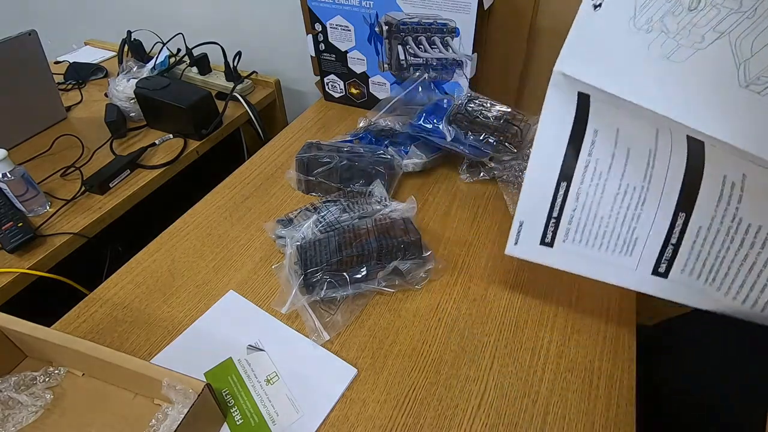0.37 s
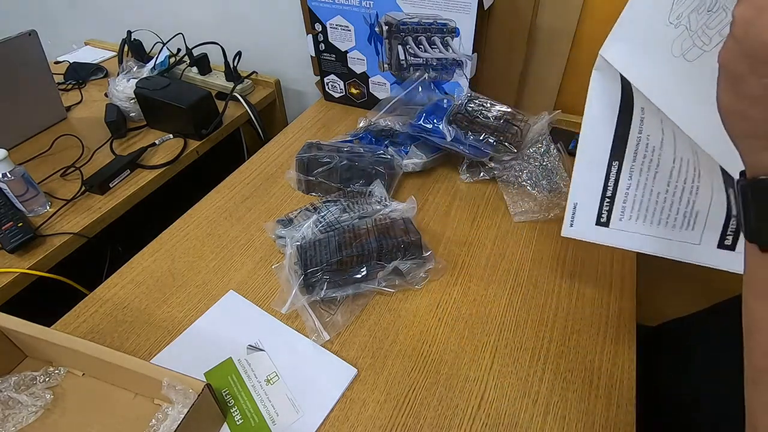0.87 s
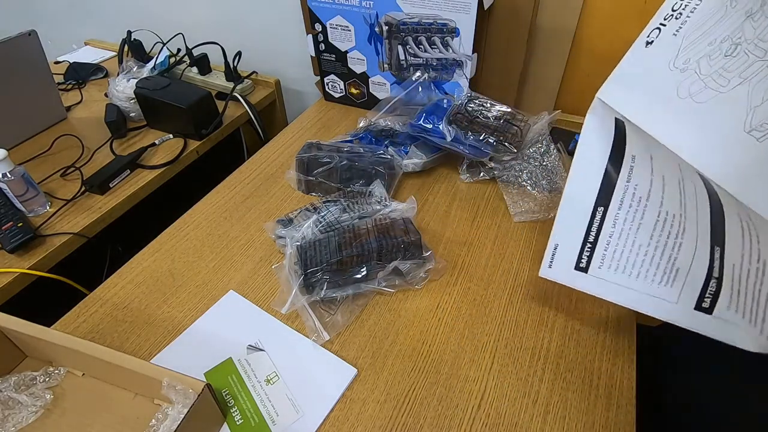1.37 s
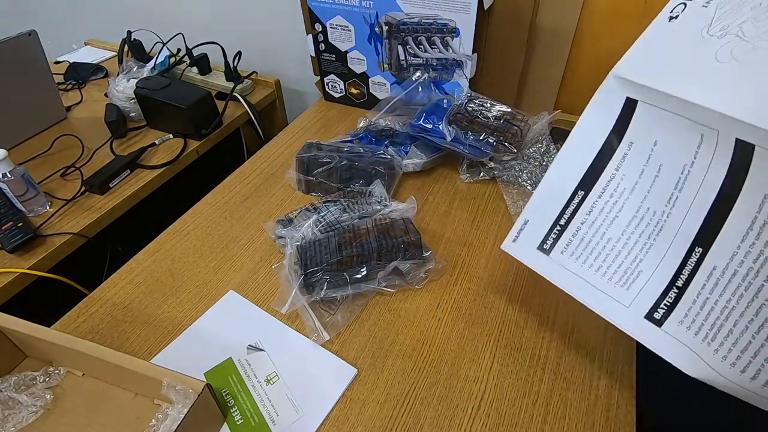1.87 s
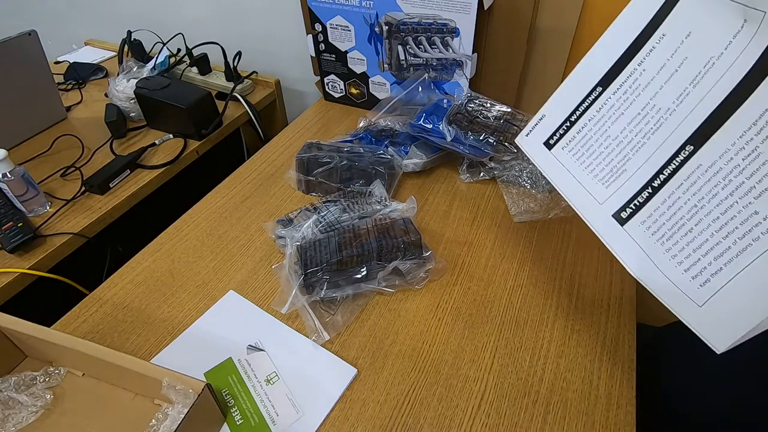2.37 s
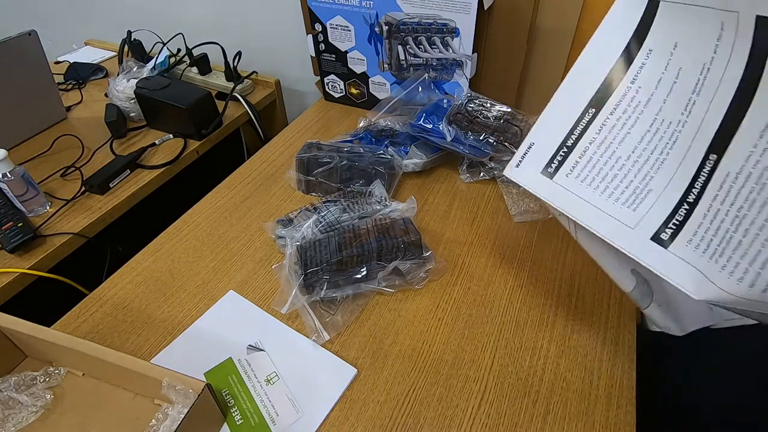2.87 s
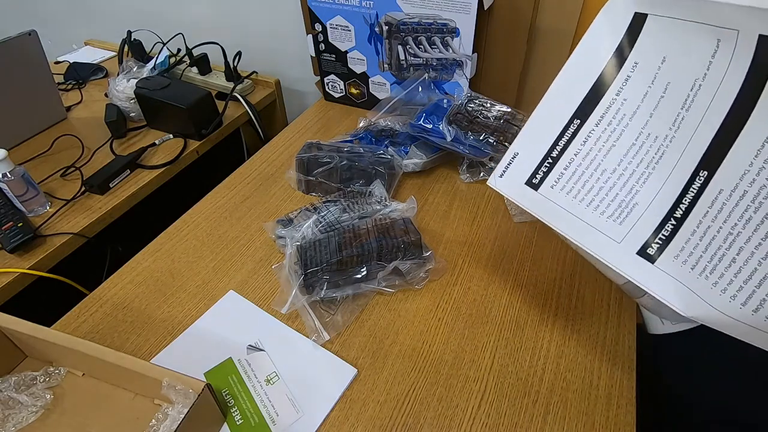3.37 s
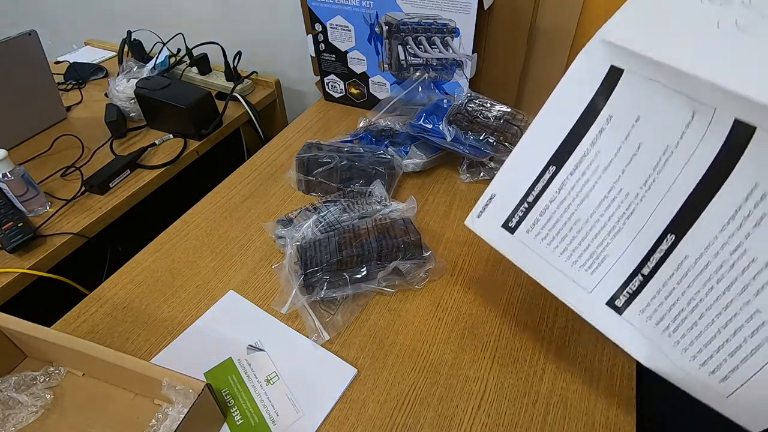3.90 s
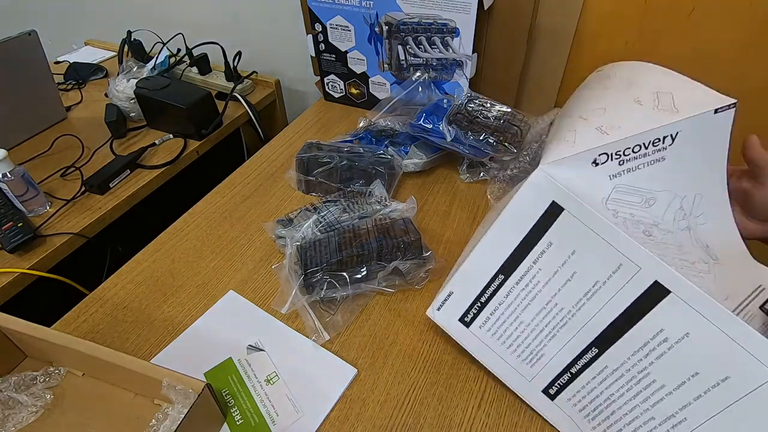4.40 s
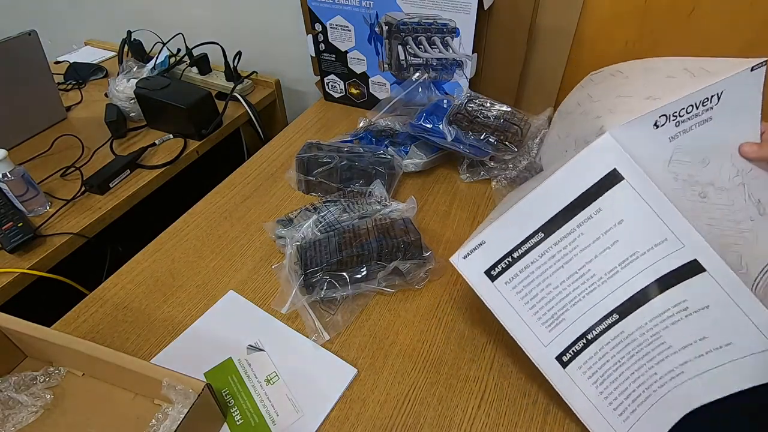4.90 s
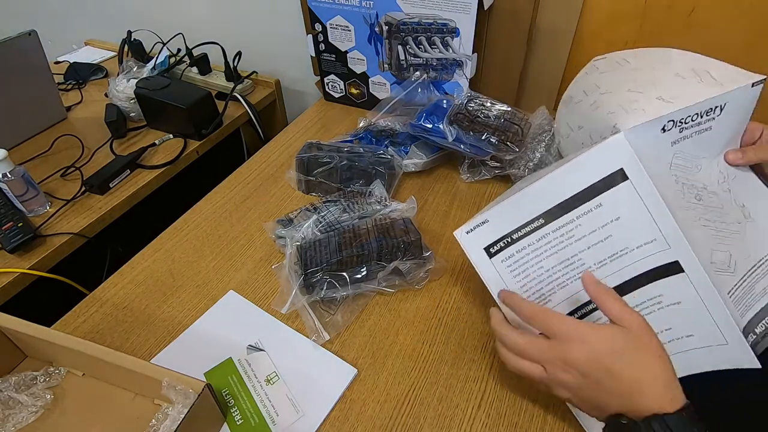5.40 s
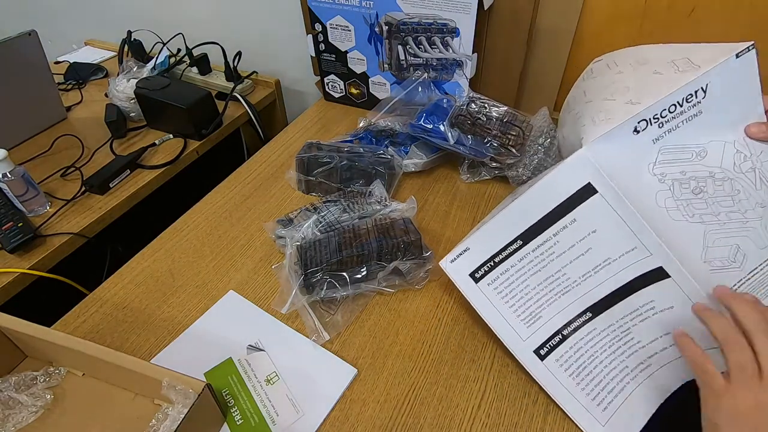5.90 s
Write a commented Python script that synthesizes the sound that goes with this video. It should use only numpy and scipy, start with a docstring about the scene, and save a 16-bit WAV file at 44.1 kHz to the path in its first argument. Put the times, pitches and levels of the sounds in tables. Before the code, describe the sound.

Close indoor sound of a large, stiff folded sheet being opened by hand, over steady soft fan air and a low hum that wavers irregularly in level. At 0 s fingers are already brushing the paper and a crease snaps sharply, followed by small ticks. From 0.5 to 1.2 s only thin, soft sliding is heard. Crisp pops come around 1.3 s, with a dull flop near 1.5 s. From 2 to 3 s the scraping thickens, with a tiny fuzzy falling squeak at 2.3 s and hollow buckles near 2.8 and 3 s. It eases until about 3.9 s, then the loudest burst arrives at 4.0-4.35 s: hard snaps, a low flap and dense rustling. Lighter rubbing and crackles follow; at 5.2-5.5 s come finger brushes, bright sharp snaps and soft pats, then small ticks fade toward 6 s. Faint low air puffs accompany the movements.

```python
"""A crease snaps over fingers already brushing the paper: a large folded sheet is turned and opened by hand.
Creases buckle as short damped rings, with dull pats of noise in a low ring; paper and fingers slide as
grainy noise with small crackles, and a narrow whistle squeaks once. Air puffs, steady fan noise and an
unsteady low hum of random level fill the bass. A small room answers the blows; the microphone has a
peak near 10 kHz."""
import sys
import numpy as np
from scipy import signal
from scipy.io import wavfile
from scipy.ndimage import uniform_filter1d

SR = 44100
rng = np.random.default_rng(int(sys.argv[2]) if len(sys.argv) > 2 else 0)


def to_wav(s):
    """Save 16-bit WAV."""
    ch = np.atleast_2d(s).T  # columns
    pcm = np.round(np.clip(ch, -1, 1) * 32767)  # PCM
    wavfile.write(sys.argv[1], SR, pcm.astype(np.int16))


def amplitude_ratio(level_db):
    """Convert a level in decibels to the matching linear amplitude (field) ratio."""
    exponent = np.asarray(level_db, float) / 20
    return 10 ** exponent


N = 265482

# Levels are those ahead of the microphone; spectra give only the shape of a sound.
# creases buckling: t/s, peak level of the body/dB, ring f/Hz,
# level of the whole sheet's flap re body/dB, level of the crisp edge re body/dB
CREASE_SNAPS = [(0.011, -22, 1190, -7.5, -37), (0.038, -33.5, 1200, -8, 1), (0.061, -41, 2900, -13, 11),
                (0.168, -40, 764, -5, -18), (0.298, -47.5, 1840, 0, 5), (0.426, -32.5, 1120, -43, -27),
                (1.071, -42, 1510, -4, -20), (1.202, -37.5, 1150, 1.5, -22), (1.28, -21.5, 1450, -48, -35),
                (1.363, -25.5, 1370, -45, -31), (1.528, -28.5, 1450, 0, -22), (1.635, -41, 1275, -7, -27),
                (1.642, -45, 1490, -8, -25), (1.922, -39, 1170, -7, -3), (1.979, -40, 1090, -2, -17),
                (2.028, -33, 1140, -7.5, -21), (2.158, -35, 730, 0.5, -18), (2.513, -39, 2580, -11, -12),
                (2.638, -38, 1270, -3, -19), (2.772, -21, 780, -5.5, -20), (2.868, -36.5, 1581, -7, -20),
                (2.991, -26.5, 780, -6, -28), (3.058, -39.5, 1450, -21, -24), (3.099, -37.5, 989, 2.5, -17),
                (3.509, -42, 1250, -15, -25), (3.609, -29, 1570, -16, -7.5), (3.362, -51, 2600, -20, -15),
                (3.665, -38, 1381, -7, -8), (3.903, -37, 2445, -24, -26), (4.005, -15, 1440, -7, -14.5),
                (4.175, -52, 1627, 2, 3.5), (4.213, -11, 720, -9.5, -12.5), (4.218, -18, 2430, -30, -17),
                (4.232, -32, 1500, -8, -20), (4.331, -14.5, 2085, -16.5, -32), (4.537, -40, 700, -16, -26),
                (4.67, -31.5, 1590, -6, -10), (4.717, -31, 4300, -29, -11), (4.796, -44, 2420, -22, 10.5),
                (4.841, -37, 644, -23, -20), (5.025, -36.5, 1224, -5, -20), (5.177, -38.5, 800, -27, -6),
                (5.192, -41, 1560, -5, 13), (5.302, -32, 1100, -13, -28), (5.379, -24.5, 3340, -26, 1),
                (5.385, -17, 3800, -20, -34), (5.594, -37, 4000, -22, -4), (5.605, -41, 3800, -25, -4),
                (5.698, -43, 1770, -25, -15), (5.73, -36.5, 2070, -30, -21), (5.766, -37, 2080, -32, -7),
                (5.891, -43, 2104, -9, -17), (5.913, -39, 1210, -13, -23)]
# what a buckling crease radiates, stretched upward for high rings: f/Hz, level/dB
SHEET_RADIATION = [(150, -50.5), (500, -3.5), (1200, 4.5), (3200, -0.5), (4200, -9), (5200, -22),
                   (7000, -25), (12000, -49)]
# dull blows, the sheet flopping over or a palm patting it flat: t/s, peak level/dB, ring f/Hz, t60 of the blow/s
DULL_PATS = [(1.531, -30.5, 254.5, 0.08), (2.993, -38.5, 170, 0.1), (4.215, -26, 245, 0.054),
             (5.323, -39, 1220, 0.087), (5.417, -37, 686, 0.096), (5.503, -32, 740, 0.066)]
# broad panels scrape past each other: t of the crest/s, rise/s, fall/s, level before clumping/dB, tautness/0-1
PANEL_STROKES = [(0.011, 0.032, 0.017, -43, 0.13), (0.066, 0.069, 0.038, -49, 0.6),
                 (0.12, .15, 0.41, -59, 0.25), (0.172, 0.022, 0.02, -54, .3),
                 (0.304, 0.038, 0.56, -60.5, 0.45), (0.65, 0.27, 0.26, -62, 0.75),
                 (0.98, 0.18, 0.53, -58, 0.66), (1.28, 0.13, 0.11, -60.5, 0.1), (1.4, 0.18, 0.23, -65, 0.9),
                 (1.544, 0.12, 0.29, -53, 0.58), (1.99, 0.11, 0.42, -61, 0.3),
                 (2.116, 0.33, .3, -52.5, 0.62), (2.224, 0.07, 0.27, -58, 0.7),
                 (2.318, 0.15, 0.13, -45.5, 0.33), (2.51, .12, 0.047, -55, 0.2),
                 (2.7, 0.15, 0.15, -47.5, 0.62), (2.872, 0.18, 0.036, -50, 0.22),
                 (2.952, 0.14, 0.21, -52, 0.53), (3.1, 0.12, 0.25, -52, 0.2),
                 (3.2, 0.15, 0.089, -53.5, 0.5), (3.358, 0.064, 0.2, -58.5, 0.43),
                 (3.52, .03, 0.15, -57, 0.36), (3.61, 0.016, 0.025, -49.5, 0.9),
                 (3.686, 0.093, 0.13, -55, 0.36), (3.81, 0.054, 0.5, -57, 0.5),
                 (4.006, .02, 0.1, -41.5, 0.57), (4.12, 0.23, 0.19, -55.5, 0.15),
                 (4.181, 0.0081, 0.2, -45.5, 0.45), (4.235, 0.039, 0.078, -40.5, 0.5),
                 (4.275, 0.13, 0.15, -41, 0.32), (4.42, .2, 0.24, -54.5, 0.27),
                 (4.723, 0.061, 0.25, -49.5, 0.35), (4.83, 0.13, 0.21, -53, 0.8),
                 (4.928, 0.11, 0.1, -50, 0.5), (5.1, 0.81, 0.61, -57, 0.47), (5.3, 0.056, 0.16, -53, 0),
                 (5.374, 0.13, 0.054, -48.5, 0.52), (5.385, 0.016, 0.017, -48, 0.6),
                 (5.43, .1, 0.27, -51, 0.33), (5.596, 0.09, 0.033, -55, 0.8), (5.75, .3, .3, -64, .5),
                 (5.92, 0.12, 0.16, -56.5, 0.34)]
# scrape of slack paper: f/Hz, level per Hz/dB
SLACK_SPECTRUM = [(300, -35.5), (900, -4.5), (1500, 3), (2500, -5.5), (4500, -36.5), (9000, -14.5),
                  (16000, -25)]
# scrape of taut paper: f/Hz, level per Hz/dB
TAUT_SPECTRUM = [(500, -53), (1500, -8.5), (2500, 0.5), (3400, -2), (5500, -11), (8000, -23.5),
                 (16000, -26)]
# fingers brush along the edges: t of the crest/s, rise/s, fall/s, level before clumping/dB
FINGER_BRUSHES = [(0.0, .1, 0.047, -47), (0.066, 0.042, 0.12, -53.5), (0.172, 0.023, 0.082, -59),
                  (0.304, .05, .3, -64.5), (0.65, 0.2, 0.19, -59), (0.98, 0.12, 0.25, -57.5),
                  (1.282, .15, .15, -67), (1.544, 0.26, 0.24, -56.5), (1.88, 0.26, .05, -70),
                  (1.99, 0.1, .3, -57), (2.116, 0.26, .3, -53), (2.25, 0.15, 0.18, -50),
                  (2.51, .15, 0.057, -67), (2.72, 0.21, .25, -59), (2.872, 0.081, 0.035, -56),
                  (2.952, 0.14, 0.14, -55.5), (3.15, .2, .3, -68), (3.52, .05, 0.091, -78),
                  (3.61, 0.027, 0.12, -64.5), (4.02, .1, .15, -61), (4.27, 0.33, 0.19, -55.5),
                  (4.5, .25, 0.28, -63.5), (4.722, 0.077, 0.45, -57), (4.928, .15, 0.15, -53),
                  (5.1, .4, .4, -64), (5.192, 0.011, 0.033, -51), (5.23, .05, .1, -58),
                  (5.374, 0.17, 0.077, -50.5), (5.386, 0.016, 0.019, -39), (5.41, .05, 0.24, -55.5),
                  (5.596, 0.019, 0.038, -55.5), (5.85, 0.65, .6, -68.5)]
# hiss of the brushing fingers: f/Hz, level per Hz/dB
BRUSH_SPECTRUM = [(1500, -43), (3500, 23.5), (5500, 15.5), (7500, 22.5), (12000, 23.5), (16000, -56)]
# the panels flex as the sheet bends over: t of the crest/s, rise and also fall/s, level before clumping/dB
PANEL_BENDS = [(0.037, 0.047, -50), (0.147, 0.06, -52), (0.503, 0.34, -60.5), (1.563, 0.097, -49),
               (1.762, 0.23, -61), (2.02, 0.18, -53), (2.46, 0.35, -56.5), (2.64, 0.099, -56),
               (3.05, 0.37, -52), (3.512, 0.036, -53.5), (3.712, 0.11, -53), (4.059, 0.11, -40.5),
               (4.2, 0.063, -47), (4.352, 0.067, -44), (5.028, 0.27, -53.5), (5.31, 0.069, -46.5),
               (5.45, 0.21, -48.5)]
# low rustle of flexing panels: f/Hz, level per Hz/dB
FLEX_SPECTRUM = [(100, -39.5), (300, -1), (600, -13.5), (1000, -14), (2000, -47.5)]
# a fingertip squeaks along the paper: t/s, f/Hz, level/dB
FINGER_SQUEAK = [(2.272, 1718, -58), (2.299, 1540, -45.5), (2.329, 1465, -42), (2.341, 1460, -77)]
# the moving sheet fans puffs of air at the microphone: t of the crest/s, level/dB
AIR_PUFFS = [(0.0, -52), (0.65, -63), (1.25, -57), (1.611, -58), (2.28, -54.5), (3.0, -57), (3.86, -68),
             (4.04, -63), (4.22, -61), (4.35, -50.5), (5.37, -63), (5.53, -60), (4.58, -61), (5.87, -59)]
# low air pressure of puffs and draught: f/Hz, level per Hz/dB
PUFF_SPECTRUM = [(10, -21), (30, 3.5), (50, -1.5), (100, 3.5), (130, 5), (200, -36)]
# air noise of the fan: f/Hz, level per Hz/dB
FAN_SPECTRUM = [(60, -21.5), (115, -28), (140, -3), (200, 0.5), (250, -3), (330, -4), (430, -11),
                (530, -21), (900, -26.5), (3000, -32), (7000, -35), (10500, -36), (11500, -63),
                (16000, -49)]
# level of the low hum, rising and falling at random: t/s, level before the fine flutter/dB
HUM_RANDOM_LEVEL = [(0.0, -43.5), (0.1, -61), (0.52, -49), (0.64, -60.5), (0.87, -46.5), (0.92, -62),
                    (1.04, -48), (1.32, -52.5), (1.46, -45), (1.54, -62), (2.62, -50.5), (3.1, -65),
                    (3.14, -51.5), (4.11, -52), (4.22, -47), (4.26, -55), (4.44, -52), (4.49, -67),
                    (4.54, -46), (4.59, -47.5), (4.83, -63), (4.9, -47.5), (5.2, -80), (5.31, -50.5),
                    (5.85, -63), (6.02, -49.5)]
# decay of the room: f/Hz, t60/s
ROOM_DECAY = [(200, 0.9), (1000, 0.5), (3000, 0.42), (8000, 0.38)]
# microphone response: f/Hz, level/dB
MICROPHONE_RESPONSE = [(6000, 0.5), (8000, -10), (9900, -5.5), (10600, -10.5), (11400, -26), (12200, -19),
                       (13000, -17), (13900, -11.5), (14800, -20), (15600, -36)]


def evened(x):
    """Scales to rms 1."""
    return x / np.sqrt(np.mean(x ** 2) + 1e-20)


def read(points, hz):
    """Reads a spectrum on a log-frequency axis."""
    f, value = np.transpose(points)
    return np.interp(np.log(hz + 1), np.log(f + 1), value)


def coloured(x, points):
    """Causal minimum-phase filter with the given spectrum, so that clicks keep their sharp start."""
    log_gain = np.log(amplitude_ratio(read(points, abs(np.fft.fftfreq(8192, 1 / SR)))))
    taps = np.fft.ifft(np.exp(np.conj(signal.hilbert(log_gain)))).real[:4096]
    return signal.oaconvolve(x, taps)[:len(x)]


def ring(x, hz, width_hz):
    """One damped resonance."""
    return signal.lfilter(*signal.iirpeak(hz, hz / width_hz, SR), x)


def from_knots(knots):
    """Joins values 64 samples apart by straight lines, one value per sample."""
    return np.interp(np.arange(N) / 64, np.arange(len(knots)), knots)


def wobble(per_s):
    """Slow chance of rms 1: noise low-passed at per_s Hz."""
    knots = rng.standard_normal(N // 64 + 2)
    lowpass = signal.butter(2, per_s * 128 / SR)
    return from_knots(evened(signal.lfilter(*lowpass, knots)))


def swell(s, rise_s, fall_s, db):
    """Summed gain of strokes that sink 20 dB within their rise before and their fall after the crest."""
    fade_db, bend = 20, 1.3  # a bend above 1 rounds the crest
    t = np.arange(0, N + 64, 64)[:, None] / SR - s
    away = np.where(t < 0, -t / rise_s, t / fall_s)
    power = amplitude_ratio(db - fade_db * away ** bend) ** 2
    return from_knots(np.sqrt(power.sum(1) + 1e-12))


def grains(per_s, spread_db):
    """Sparse slips of random sign and size; spread_db makes a few larger still."""
    size = amplitude_ratio(spread_db * np.minimum(rng.exponential(1, N), 2.5))
    happens = rng.random(N) < per_s / SR
    return evened(size * rng.standard_normal(N) * happens)


def snaps():
    """Each crease yields, jumps, and bending waves rattle back from the edges of the sheet."""
    t60_at_1khz_s, shortening = 0.041, 0.46  # higher rings die sooner by this power
    t, out = np.arange(6000) / SR, np.zeros(N + 6000)
    for s, peak_db, hz, flap_db, crisp_db in CREASE_SNAPS:
        t60 = t60_at_1khz_s * (1000 / hz) ** shortening
        signs = rng.choice([-1., 1.], len(t))
        returns = (rng.random(len(t)) < .14) * (t > .0018)
        rattle = .33 * signs * returns * amplitude_ratio(-60 * t / t60)
        rattle[[30, 62]] = .35, -1  # a small give just before the jump
        radiation = [(f * max(1, hz / 1900), db) for f, db in SHEET_RADIATION]  # small tight creases reach higher
        body = coloured(ring(rattle, hz, 0.45 * hz) + 0.3 * rattle, radiation)
        flap = ring(ring(rattle, 420, 350), 330, 400)
        crisp = ring(ring(rattle, 7600, 6400), 8800, 5300)
        parts = ((body, 0), (flap, flap_db), (crisp, crisp_db))
        sound = sum(amplitude_ratio(peak_db + db) * part / abs(part).max() for part, db in parts)
        out[round(s * SR):][:len(t)] += sound
    return out[:N]


def pats():
    """A soft, dull blow: noise in a low ring that starts gently."""
    t, out = np.arange(8000) / SR, np.zeros(N + 8000)
    for s, peak_db, hz, t60 in DULL_PATS:
        onset = 1 - np.exp(-t / 0.0013)
        blow = rng.standard_normal(len(t)) * onset * amplitude_ratio(-60 * t / t60)
        sound = ring(ring(blow, hz, 0.35 * hz), 0.71 * hz, 1.0 * hz)
        out[round(s * SR):][:len(t)] += amplitude_ratio(peak_db) * sound / abs(sound).max()
    return out[:N]


def scrape(slack_gain, taut_gain, crackle, clumps):
    """Panels rub past each other, with one colour for slack paper and another for taut."""
    slack = evened(coloured(rng.standard_normal(N) + 0.58 * crackle, SLACK_SPECTRUM))
    taut = evened(coloured(rng.standard_normal(N) + 0.77 * crackle, TAUT_SPECTRUM))
    return (slack_gain * slack + taut_gain * taut) * amplitude_ratio(1.27 * clumps)


def brush(crackle, clumps):
    """Fingers along the edges set off a fine hiss of many small slips."""
    fizz = grains(900, spread_db=0)
    slips = rng.standard_normal(N) + 0.38 * fizz + 0.23 * crackle
    hiss = evened(coloured(slips, BRUSH_SPECTRUM))
    return hiss * swell(*np.transpose(FINGER_BRUSHES)) * amplitude_ratio(0.35 * clumps)


def flex(slack_gain, crackle, clumps):
    """Bending panels rustle low; every stroke over slack paper bends them a little too."""
    s, length_s, db = np.transpose(PANEL_BENDS)
    gain = np.hypot(swell(s, length_s, length_s, db), amplitude_ratio(-4.5) * slack_gain)
    rustle = evened(coloured(rng.standard_normal(N) + 0.7 * crackle, FLEX_SPECTRUM))
    return rustle * gain * amplitude_ratio(2.0 * clumps)


def slide():
    """Fibres catch and let go in clumps: fine hiss with coarser slips, shared by scrape, brush and flex."""
    s, rise_s, fall_s, db, taut = np.transpose(PANEL_STROKES)
    taut = np.clip(taut, .001, .999)
    slack_gain = swell(s, rise_s, fall_s, db + 10 * np.log10(1 - taut))
    taut_gain = swell(s, rise_s, fall_s, db + 10 * np.log10(taut))
    clumps = wobble(per_s=48)
    crackle = grains(300, spread_db=1.0)
    rubbing = scrape(slack_gain, taut_gain, crackle, clumps)
    return rubbing + brush(crackle, clumps) + flex(slack_gain, crackle, clumps)


def patchy(x, spread_db):
    """Different areas of the sheet sound by turns: random patches over time and pitch."""
    z = signal.stft(x, nperseg=256)[2]
    patches = uniform_filter1d(rng.standard_normal(z.shape), size=5, axis=0)  # over pitch
    patches = uniform_filter1d(patches, size=12, axis=1)  # over time
    return signal.istft(z * amplitude_ratio(spread_db * evened(patches)), nperseg=256)[1][:N]


def squeak():
    """A fuzzy whistle from quick stick and slip: slow complex noise rides on a gliding tone."""
    s, hz, db = np.transpose(FINGER_SQUEAK)
    t = np.arange(N) / SR
    noise = rng.standard_normal((N, 2)) @ [1, 1j]
    fuzz = signal.lfilter(*signal.butter(1, 70, fs=SR), noise)
    carrier = np.exp(2j * np.pi * np.cumsum(np.interp(t, s, hz)) / SR)
    gain = amplitude_ratio(np.interp(t, s, db, left=-200, right=-200))
    return evened((fuzz * carrier).real) * gain


def puffs():
    """Lumpy low air pressure: a restless draught and the puffs from the sheet."""
    puff_s, draught_db = 0.15, -70
    s, db = np.transpose(AIR_PUFFS)
    draught = amplitude_ratio(draught_db + 3 * wobble(per_s=7))
    gain = np.hypot(swell(s, puff_s, puff_s, db), draught)
    return gain * evened(coloured(rng.standard_normal(N), PUFF_SPECTRUM))


def fan():
    """Steady air noise and an unsteady low hum of random level, with a fine flutter in pitch and level."""
    air_db, hum_hz = -50, 167.7
    turns = np.cumsum(hum_hz + 4 * wobble(per_s=9.2)) / SR
    s, db = np.transpose(HUM_RANDOM_LEVEL)
    hum_db = np.interp(np.arange(N) / SR, s, db) + 1.4 * wobble(per_s=27)
    hum = np.sqrt(2) * amplitude_ratio(hum_db) * np.sin(2 * np.pi * (turns + rng.random()))
    air = evened(coloured(rng.standard_normal(N), FAN_SPECTRUM))
    return amplitude_ratio(air_db) * air + hum


def room(x):
    """Sparse reflections of random sign, each band dying at its own speed."""
    taps = np.zeros(SR // 2)
    at = np.arange(200, len(taps) - 20, 20)
    taps[at + rng.integers(0, 20, len(at))] = rng.choice([-1., 1.], len(at))
    hz, t, z = signal.stft(taps, SR, nperseg=256)
    decay = amplitude_ratio(-60 * t / read(ROOM_DECAY, hz)[:, None])
    tail = signal.istft(z * decay, SR, nperseg=256)[1]
    return signal.oaconvolve(x, tail / np.linalg.norm(tail))[:N]


def scene():
    """Paper close by, the room answering its blows, the fan under all."""
    blows = snaps() + pats()
    paper = blows + patchy(slide(), spread_db=2.07) + squeak()
    return (paper + amplitude_ratio(-13.5) * room(blows) + puffs() + fan())[None]


def top_cut(x):
    """Nothing passes above the cut-off."""
    return signal.sosfilt(signal.butter(12, 15610, fs=SR, output="sos"), x)


def record(dry):
    """The microphone colours the whole scene."""
    mix = coloured(dry[0], MICROPHONE_RESPONSE)[None]
    return top_cut(mix)


dry = scene()
out = record(dry)
to_wav(out)
```